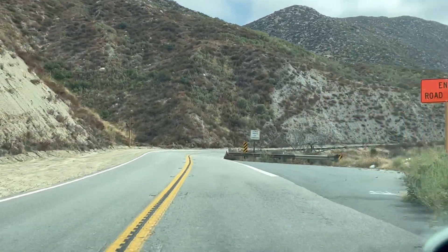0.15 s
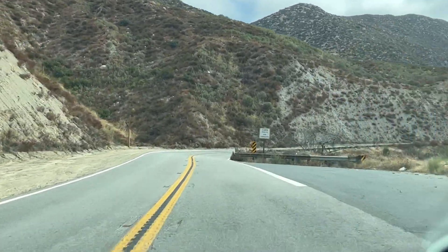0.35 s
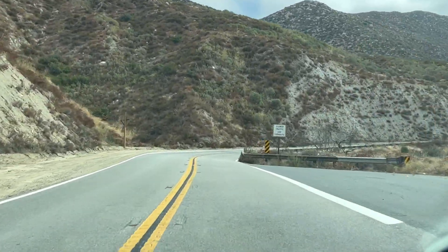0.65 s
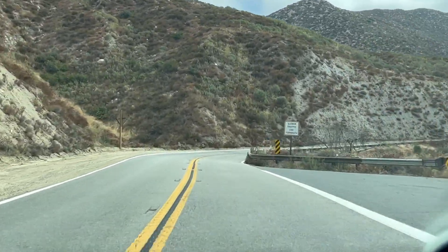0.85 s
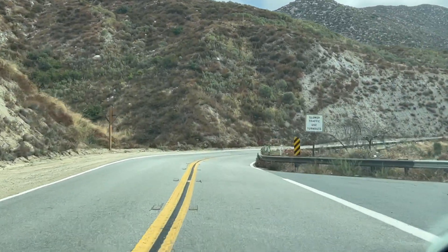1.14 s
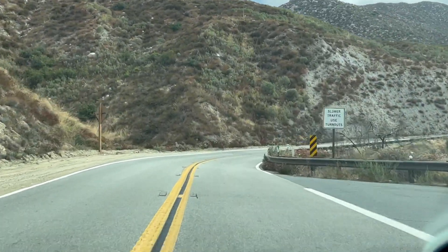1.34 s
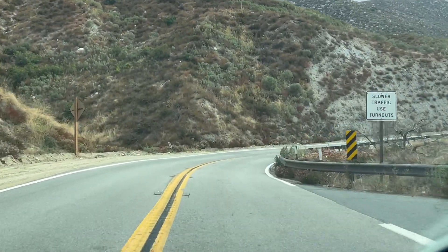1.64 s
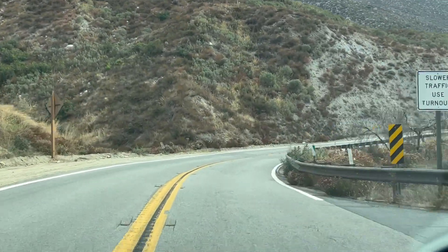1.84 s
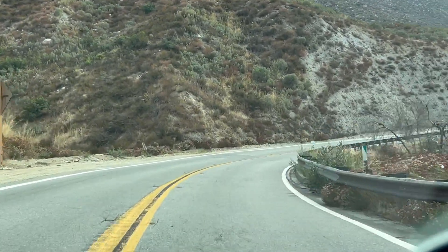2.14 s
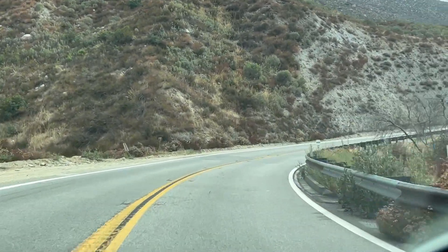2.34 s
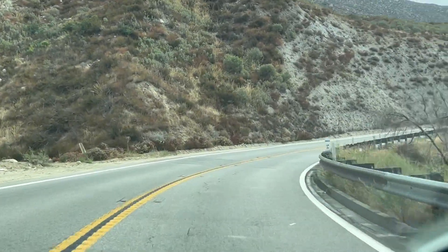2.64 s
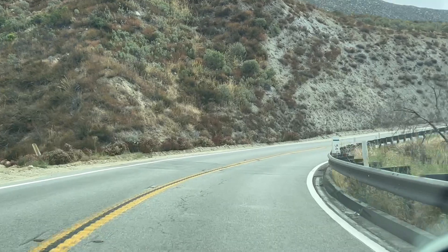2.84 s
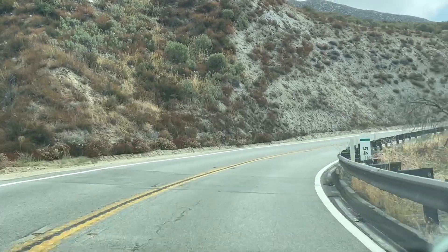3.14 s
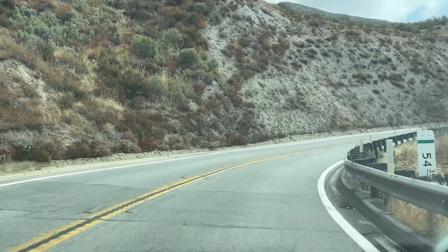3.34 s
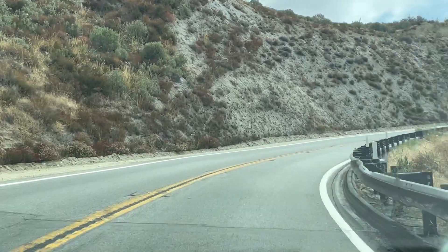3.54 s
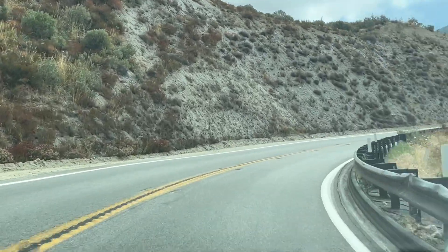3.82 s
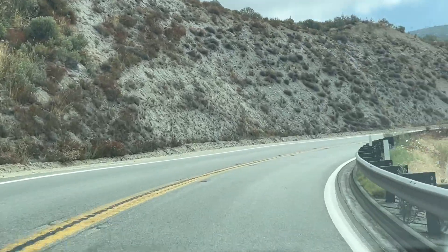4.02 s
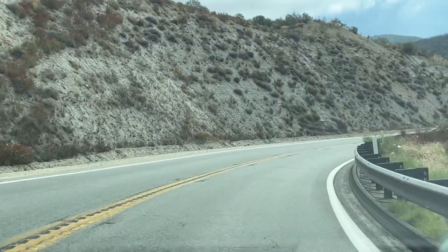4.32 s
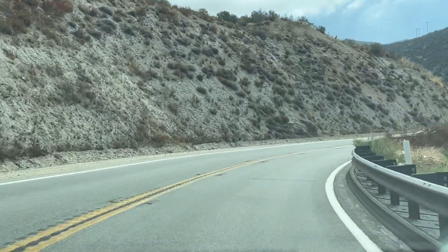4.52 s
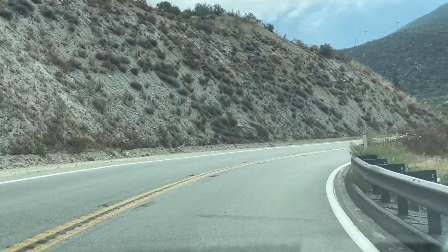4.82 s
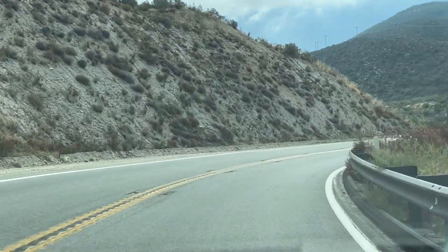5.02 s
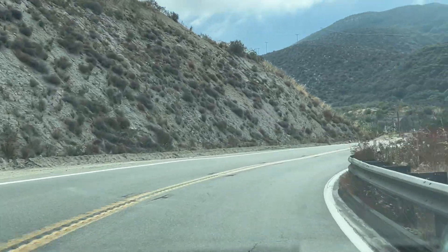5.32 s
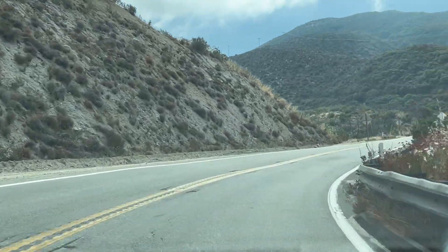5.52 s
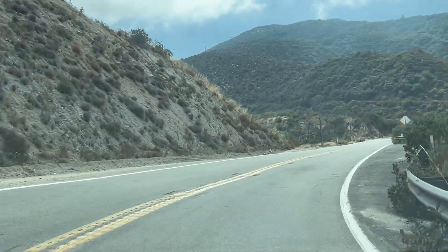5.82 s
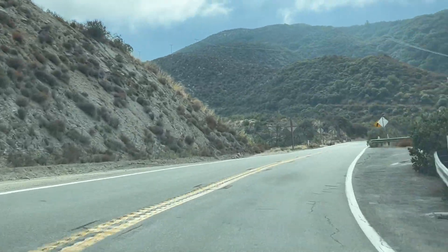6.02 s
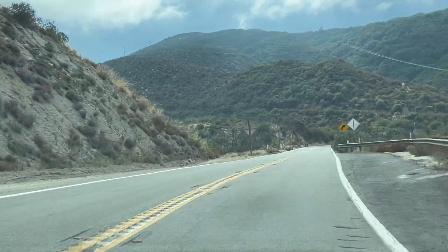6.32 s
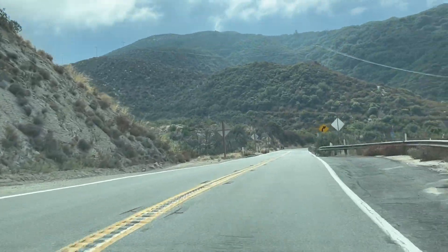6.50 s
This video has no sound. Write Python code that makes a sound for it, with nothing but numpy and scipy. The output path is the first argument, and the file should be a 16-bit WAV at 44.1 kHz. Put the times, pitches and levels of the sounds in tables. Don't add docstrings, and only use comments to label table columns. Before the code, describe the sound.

Low car engine hum with exhaust pops on overrun, then a steady, hardening pull with intake hiss and faint turbo whine.

```python
import sys
import numpy as np
from scipy import signal
from scipy.fft import rfft, irfft, next_fast_len
from scipy.io import wavfile
from scipy.ndimage import uniform_filter1d

SR = 44100
rng = np.random.default_rng(int(sys.argv[2]) if len(sys.argv) > 2 else 0)


def gain_from_decibels(decibels):
    exponent = np.asarray(decibels, float) / 20
    return 10 ** exponent


def wav_record(signal):
    frames = np.transpose(np.atleast_2d(signal))
    bounded = np.clip(frames, -1, 1)
    quanta = np.round(bounded * 32767).astype(np.int16)
    wavfile.write(sys.argv[1], SR, quanta)


N = 293706
TIME_S = np.arange(N) / SR

# start_s, firing_rate_hz, boom_db, sharpness_db, airflow_db
DRIVE = [(0, 116.2, -22, -16, -11.5), (.42, 120.4, -22, -12.5, -11.5), (0.479, 119.2, -15.5, -21, -6),
         (1.001, 116.9, -15, -9.5, -2), (1.4, 115, -15, -6, -3), (1.82, 113.6, -13.5, 0.5, -1.5),
         (1.9, 112.6, -19, -1.5, -5.5), (2.16, 111.6, -14.5, 5, -9), (2.269, 111.6, -11.5, 4, -3),
         (2.5, 113.1, -13.5, 1.5, -3.5), (2.8, 113.4, -11, 5.5, 5), (3.8, 116, -11, 4, 7.5),
         (4.25, 116.4, -12, 0, 4.5), (4.6, 118.5, -10.5, 6, 7.5), (5.099, 121.2, -9, 9, 14),
         (5.9, 124.4, -11.5, 3.5, 8.5), (6.25, 129.3, -11.5, 7.5, 10.5), (6.66, 129.1, -10.5, 9.5, 16)]
# start_s, shift_rad (of the firing phase), dip_db
TIMING = [
    (4.333, 1, 0),
    (4.56, -1, -1),
    (5.689, 1.3, -1),
    (5.813, -1, -1),
    (5.934, 1.6, -3.5),
]
# start_s, crack_db, thud_db, pipe_ring_db, tailpipe_hz
POPS = [(0.416, -56, -46, -1, 1400), (0.605, -27, -26, 0.5, 1600), (0.621, -23.5, -28.5, -10.5, 2360),
        (0.72, -41, -36.5, 0.5, 1300), (0.7634, -47.5, -44, 3.5, 1554), (0.8405, -41, -32, 3, 1534),
        (0.8764, -41, -43.5, -3.5, 1290), (0.9821, -37, -30.5, -0.5, 1565), (1.0167, -47, -44.5, -2, 3950),
        (1.1332, -27, -24, 0.5, 2100), (1.1745, -37.5, -47, -2.5, 1348), (1.2719, -33.5, -30.5, 5.5, 1573),
        (1.321, -51, -47.5, -8, 1480), (1.4125, -28.5, -27, 0, 1357), (1.4829, -53, -51, -5.5, 2540),
        (1.5995, -30, -29.5, 5, 1527), (1.8351, -35.5, -30, 5.5, 1610)]
# start_s, length_s, pitch_hz, level_db
LEAK = [
    (6.33, .27, 10740, -53.5),
]
# rest_db, db_per_db of sharpness, db_per_db of airflow
ROAR_LAW, HISS_LAW = (-48.5, 0.13, 0.32), (-60.5, .01, 1)
SPELL_FADE_S = 0.11
THROTTLE_S = 2.14


def evened(x):
    return x / np.sqrt(np.mean(x ** 2) + 1e-20)


def read(points, hz):
    f, value = np.transpose(points)
    return np.interp(np.log(hz + 1), np.log(f + 1), value)


def curves(rows):
    s, *columns = np.transpose(rows)
    return [np.interp(TIME_S, s, c) for c in columns]


def follow(law):
    rest_db, per_sharp, per_flow = law
    _, _, sharp_db, flow_db = curves(DRIVE)
    return rest_db + per_sharp * sharp_db + per_flow * flow_db


def spell(start, length, fade):
    t = TIME_S - start
    return np.clip(t / fade + .5, 0, 1) * np.clip((length - t) / fade + .5, 0, 1)


def wander(top_hz):
    coarse = rng.standard_normal(N // 64 + 1000)
    lowpass = signal.butter(2, top_hz, fs=SR / 64, output="sos")
    coarse = signal.sosfiltfilt(lowpass, coarse)[500:]
    return evened(np.interp(np.arange(N) / 64, np.arange(len(coarse)), coarse))


def coloured(points, size):
    hz = np.fft.rfftfreq(size, 1 / SR)
    inside = (hz > points[0][0]) & (hz < points[-1][0])
    return evened(irfft(rfft(rng.standard_normal(size)) * gain_from_decibels(read(points, hz)) * inside, size))


def resonate(x, hz, width):
    turn = np.exp(2j * np.pi * np.cumsum(hz * np.ones(len(x))) / SR)
    r = np.exp(-np.pi * width / SR)
    return 2 * (turn * signal.lfilter([1 - r], [1, -r], x / turn)).real


def partial(multiple, level_db, angle, ratio=1):
    order = round(2 * multiple) / 2
    return np.sqrt(2) * gain_from_decibels(level_db) * np.cos(order * ratio * angle + rng.uniform(0, 2 * np.pi))


def firing_phase(hz, shake_rad=0.026, step_s=0.022):
    angle = 2 * np.pi * np.cumsum(hz) / SR + shake_rad * wander(34)
    for s, shift, _ in TIMING:
        angle = angle + shift * np.clip((TIME_S - s) / step_s + .5, 0, 1)
    return angle


def firing_boom(angle, step_s=0.022, turn_s=0.13):
    boom_db = curves(DRIVE)[1] + 0.079 * wander(33)
    for s, _, dip_db in TIMING:
        boom_db = boom_db + dip_db * np.exp(-((TIME_S - s) / step_s) ** 2)
    torque = np.tanh((TIME_S - THROTTLE_S) / turn_s)
    return np.sqrt(2) * gain_from_decibels(boom_db) * np.cos(angle) * torque


def firing_harmonics(hz, angle, flutter_db=0.5, drift_db=0.5):
    upper_orders = [(3.5, -13), (4, -0.5), (4.5, -17), (5, -1.5), (5.5, -6.5), (6, -5), (6.5, -15),
                    (7, -9.5), (7.5, -22), (8, -15.5), (9, -14.5)]
    # pitch_hz, gain_db
    cabin_gain = [(400, 0.5), (520, -2.5), (575, -4), (610, -4), (645, 4), (690, -3.5), (750, 10),
                  (800, -2), (850, -2.5), (1000, -5.5), (1200, -5)]
    # firing_rate_hz, gain_db
    third_tuning = [(111, 0), (116, 3), (120, -1.5), (124.5, -5), (128, 1), (131, 5)]
    upper_tuning = [(111, 2), (115, -0.5), (117.5, -2), (121, -2), (124, -1), (126, 5), (131, 11)]
    # start_s, length_s, multiple, gain_db
    order_flares = [(2.702, 0.27, 6, 10.5), (3, 0.48, 4, 5), (3.05, 0.95, 6.5, 7), (3.05, .45, 7, 8.5),
                    (3.25, 0.11, 3, -13), (3.38, .35, 3, 3), (4.35, 0.26, 3, 4), (6.7, 0.35, 3, 1.5),
                    (4.05, .5, 5, -8), (3.6, .4, 6, -6), (6.2, 0.35, 5.5, -2.5), (6.2, 0.7, 6, -4.5),
                    (6.2, 0.56, 7, -5.5), (5.95, 0.45, 5, -6), (3.85, 0.29, 4, 9), (4.8, 0.23, 5.5, 8),
                    (4.7, 0.49, 4, 6.5), (6.1, 1, 7, 4), (5.95, .25, 6, -2), (5.9, 0.24, 7, 5),
                    (5.647, 0.37, 8, 16)]
    push_db = 7 * np.clip((TIME_S - THROTTLE_S) / 0.046 + 1, 0, 1)
    second_db = follow((-34.5, 1.066, .01))
    third_db = follow((-51, .4, 0.054)) + push_db + read(third_tuning, hz)
    upper_db = follow((-59.5, .6, 0.19)) + push_db + read(upper_tuning, hz)
    orders = [(2, second_db), (3, third_db + 1.5 * wander(3))]
    for k, db in upper_orders:
        orders.append((k, upper_db + db + read(cabin_gain, k * hz) + drift_db * wander(0.36)))
    out = np.zeros(N)
    for k, db in orders:
        for s, length, multiple, flare_db in order_flares:
            if round(2 * multiple) == round(2 * k):
                db = db + flare_db * spell(s, length, SPELL_FADE_S)
        out += partial(k, db + flutter_db * wander(5.9), angle)
    return out


def half_orders(angle, rough_db=2.):
    # multiple, level_db
    uneven_orders = [(.5, -5), (1.5, -4), (2.5, -15.5)]
    half_db = follow((-46, 0.16, 0.89))
    return sum(partial(k, half_db + db + rough_db * wander(10), angle) for k, db in uneven_orders)


def air(throb=.08):
    # pitch_hz, level_db
    rumble = [(18, -30.5), (31, -2.5), (45, 6), (70, -3), (100, -2), (160, -8.5), (230, -9.5), (300, -25.5),
              (400, -27.5)]
    roar = [(200, -8.5), (350, 3.5), (520, -0.5), (700, -4.5), (860, -2.5), (1050, -3.5), (1300, -8.5),
            (1600, -15.5), (2500, -33.5), (3200, -37)]
    hiss = [(1300, -9.5), (1900, -1.5), (2500, 0.5), (3000, -1), (3400, -2), (4000, -6.5), (5000, -3.5),
            (6000, -5.5), (7500, -3.5), (8500, -7), (9700, -2), (10300, -15)]
    fizz = [(9700, -22.5), (10300, -2.5), (10800, 1), (12500, -1.5), (13500, -9), (14700, -3), (15700, -15),
            (16000, -44.5)]
    beat = 1 + throb * np.cos(2 * np.pi * np.cumsum(curves(DRIVE)[0]) / SR)
    gust = wander(31)
    rumble_gain = gain_from_decibels(follow((-36, -0.2, 0.0089)) + 3 * wander(3) + 2 + .4 * gust)
    roar_gain = gain_from_decibels(follow(ROAR_LAW) + 2 + .9 * gust)
    hiss_gain = beat * gain_from_decibels(follow(HISS_LAW) + 1 + .9 * gust)
    fizz_level = gain_from_decibels(follow((-70.5, .01, 0.58)))
    for s, length, _, db in LEAK:
        fizz_level = fizz_level + gain_from_decibels(db - 1.5) * spell(s, length, SPELL_FADE_S)
    fizz_gain = beat * fizz_level * gain_from_decibels(4 + 1.3 * gust)
    layers = [(rumble, rumble_gain), (roar, roar_gain), (hiss, hiss_gain), (fizz, fizz_gain)]
    return [sum(gain * coloured(points, N) for points, gain in layers) for _ in range(2)]


def patchy(twins, depth_db=3.5):
    z = signal.stft(np.array(twins), nperseg=2048)[2]
    field = uniform_filter1d(rng.standard_normal(z.shape[1:]), size=2, axis=0)
    field = evened(uniform_filter1d(field, size=9, axis=1))
    gain = gain_from_decibels(depth_db * np.clip(field, -2.5, 2) - 1.1)
    return signal.istft(z * gain, nperseg=2048)[1][:, :N]


def ducts(drift_db=3.):
    # pitch_hz, width_hz, level_db (over the air noise)
    duct_modes = [(1020, 75, -17.5), (1350, 60, -17), (1731, 73, -12.5), (1950, 52, -14.5),
                  (2100, 30, -17.5), (2450, 85, -12.5), (2590, 100, -16)]
    air_db = (follow(ROAR_LAW) + follow(HISS_LAW)) / 2
    out = np.zeros(N)
    for hz, width, db in duct_modes:
        ring = signal.lfilter(*signal.iirpeak(hz, hz / width, SR), rng.standard_normal(N))
        out += gain_from_decibels(air_db + db + drift_db * wander(5.1)) * evened(ring)
    return out


def drone(flutter_db=3.5):
    # start_s, pitch_hz, level_db
    drone_course = [
        (.2, 84.56, -50),
        (.38, 85.8, -33.5),
        (.5, 79.82, -37.5),
        (.94, 80.42, -27),
        (1.3, 77.77, -27),
        (1.75, 76, -29),
        (2.1, 75.65, -25.5),
        (2.4, 77, -35.5),
        (2.55, 77, -70),
    ]
    # multiple, level_db
    drone_orders = [(1, -2.5), (2, -12), (4, -28.5), (5, -31.5)]
    hz, level_db = curves(drone_course + [(2.7, 77, -120)])
    u = np.arange(-SR // 8, SR // 2) / SR
    shake_db = 4.5 * (u > 0) * np.exp(-abs(u) / 0.14)
    stall_db = -7.5 * np.exp(-(u / 0.012) ** 2)
    for s, _, thud_db, ring_db, _ in POPS:
        strength = gain_from_decibels(thud_db + ring_db + 25)
        level_db[round((s + u[0]) * SR):][:len(u)] += strength * (shake_db + stall_db)
    level_db = uniform_filter1d(level_db, size=400)
    angle = 2 * np.pi * np.cumsum(hz) / SR
    out = np.zeros(N)
    for k, db in drone_orders:
        out += gain_from_decibels(level_db + db + flutter_db * wander(31)) * np.cos(round(k) * angle)
    return np.sqrt(2) * out


def pops(rise_s=.003, fall_s=.007, crack_s=0.021):
    # pitch_hz, level_db
    crack_spectrum = [(700, 6), (1100, -4), (1650, -2.5), (2400, -9.5), (3200, -10), (4500, -19.5),
                      (6300, -14.5), (9000, -18.5), (12000, -15.5), (16000, -32.5)]
    # pitch_hz, width_hz, level_db
    thud_modes = [(172, 3.3, 7.5), (234, 6, 1.5), (282, 26, 1), (405, 17, 1.5), (433, 21, -3.5),
                  (558, 46, -4.5), (635, 58, -7.5), (721, 30, -7)]
    out, u = np.zeros(N), np.arange(4096) / SR
    shape = np.clip(u / rise_s, 0, 1) * np.exp(-u / (2 * crack_s) - np.maximum(u - crack_s, 0) / fall_s)
    for s, crack_db, thud_db, _, pipe_hz in POPS:
        dark_db = 3.5 + 0.05 * (thud_db + 33)
        crack = coloured([(f, db - dark_db * np.log2(f / 2000)) for f, db in crack_spectrum], len(u))
        crack = crack + 0.7 * evened(resonate(rng.standard_normal(len(u)), pipe_hz, 200))
        ragged = gain_from_decibels(2.5 * evened(uniform_filter1d(rng.standard_normal(len(u)), 120)))
        thud = np.zeros(len(u))
        for f, width, db in thud_modes:
            strike = gain_from_decibels(db + 2 * rng.standard_normal()) * np.exp(-np.pi * width * u / 2)
            thud += strike * np.sin(2 * np.pi * (f * rng.uniform(0.96, 1.07) * u + rng.random()))
        at = round((s - rise_s) * SR)
        out[at:at + len(u)] += shape * (gain_from_decibels(crack_db - 9.0) * crack * ragged + gain_from_decibels(thud_db) * thud)
    return out


def pipe_ring(hz, angle, rise_s=0.0055, decay_s=0.037, pitch_ratio=1.092):
    out, u = np.zeros(N), np.arange(SR // 8) / SR
    for s, _, thud_db, ring_db, _ in POPS:
        at = round(s * SR)
        swell = gain_from_decibels(thud_db + 10.5 + ring_db) * np.clip(u / rise_s, 0, 1) * np.exp(-(u / decay_s) ** 4 / 2)
        out[at:at + len(u)] -= swell * np.cos(angle[at] + 2 * np.pi * pitch_ratio * hz[at] * u)
    return np.sqrt(2) * out


def turbo(fade_s=0.14):
    # start_s, length_s, pitch_hz, level_db
    compressor = [
        (2.7, 0.78, 6520, -62),
        (4.95, 0.69, 7740, -60),
        (6.15, .4, 6700, -55.5),
    ]
    intake_pipe = [
        (3.4, 0.37, 3350, -59.5),
        (4.8, 1.25, 3500, -60),
        (6.35, .5, 3400, -67),
    ]
    out = np.zeros(N)
    # bands, width_hz, climb_hz_per_s
    for rows, width, climb in ((compressor, 750, 300), (LEAK, 700, 0), (intake_pipe, 300, 0)):
        for s, length, hz, db in rows:
            gain = spell(s, length, fade_s)
            on = gain > 0
            track = hz + climb * np.arange(on.sum()) / SR
            band = resonate(rng.standard_normal(N)[on], track, width)
            out[on] += gain_from_decibels(db) * gain[on] * evened(resonate(band, track, width))
    return out


def gearbox_shaft(angle, slip=.982, rough_db=2.):
    # start_s, level_db
    shaft_course = [
        (5.8, -69.5),
        (5.95, -45.5),
        (6.25, -41.5),
        (6.4, -35),
        (6.66, -36.5),
    ]
    # multiple, level_db
    shaft_orders = [(1, 2), (2, -8.5), (2.5, -8), (3, -3.5), (4, -10), (4.5, -5.5), (5, -2.5), (6, -9.5)]
    shaft_db, = curves([(0.0068, -120)] + shaft_course)
    return sum(partial(k, shaft_db + db + rough_db * wander(25), angle, slip) for k, db in shaft_orders)


def ports(x, other=None):
    # pitch_hz, level_db
    port_lean = [(40, 2.7), (75, 4), (118, 4), (175, 5), (240, 14), (290, 14.5), (350, 6.5), (480, -0.5),
                 (700, 2.5), (1300, 5), (2300, 0)]
    # pitch_hz, likeness (0-1)
    port_likeness = [(40, .995), (130, .995), (180, .95), (250, .7), (300, .5), (500, .4), (720, .7),
                     (1100, .4), (1500, .4), (1900, .8), (2500, .95), (8500, .98), (16000, .99)]
    # pitch_hz, phase_rad
    right_phase = [(40, -.14), (430, .3), (780, 2.8), (1600, 5.9), (3100, 5.6), (8600, 6.3), (9100, 7.9),
                   (10050, 9.4), (10500, 9.6), (11900, 12.5), (12300, 12.6), (13300, 15.6), (14300, 15.8),
                   (15300, 18.8)]
    margin = next_fast_len(N // 2 + 2048) - N // 2
    hz = np.fft.rfftfreq(N + 2 * margin, 1 / SR)
    edges = signal.windows.tukey(N + 2 * margin, 2 * margin / N)

    def spectrum(v):
        return rfft(edges * np.pad(v, margin, "reflect", reflect_type="odd"))

    left = right = spectrum(x)
    if other is not None:
        same = np.clip(read(port_likeness, hz), 0, 1)
        right = same * left + np.sqrt(1 - same ** 2) * spectrum(other)
    lean = gain_from_decibels(read(port_lean, hz) / 2)
    lead = np.exp(1j * read(right_phase, hz))
    return irfft([left * lean, right / lean * lead])[:, margin:margin + N]


def scene():
    hz = curves(DRIVE)[0]
    angle = firing_phase(hz)
    engine = firing_boom(angle) + firing_harmonics(hz, angle) + half_orders(angle)
    engine = engine + pipe_ring(hz, angle) + gearbox_shaft(angle)
    diffuse = np.array([pops(), pops()]) + patchy(air())
    return ports(engine + ducts() + drone() + turbo()) + ports(*diffuse)


def band_limit(x):
    return signal.sosfilt(signal.butter(12, 15780, fs=SR, output="sos"), x)


def record(dry, knee=.72, room=.2):
    over = np.maximum(abs(dry) - knee, 0)
    soft = dry - np.sign(dry) * (over - room * np.tanh(over / room))
    return band_limit(soft)


dry = scene()
out = record(dry)
wav_record(out)
```